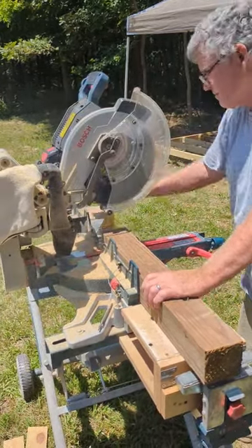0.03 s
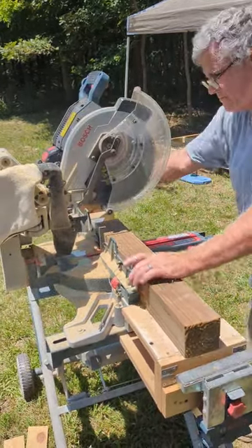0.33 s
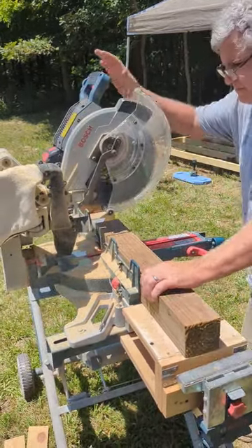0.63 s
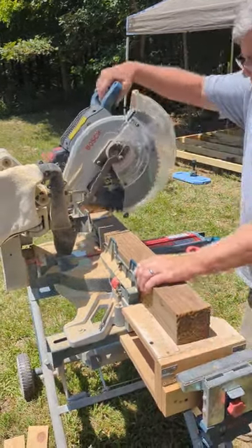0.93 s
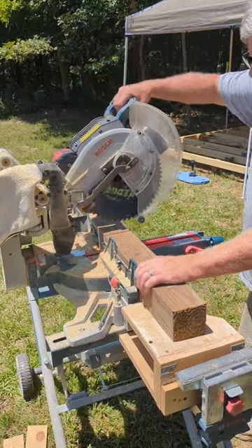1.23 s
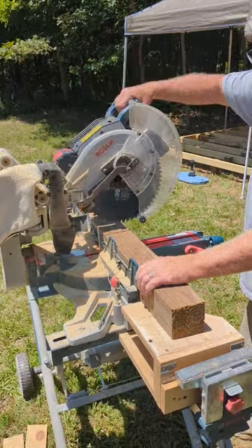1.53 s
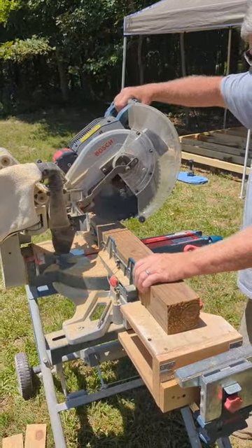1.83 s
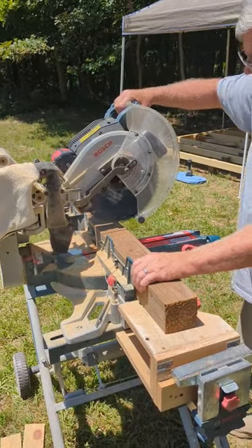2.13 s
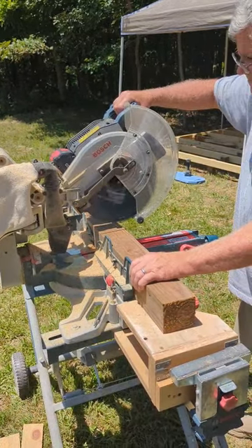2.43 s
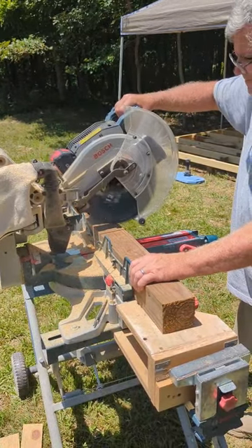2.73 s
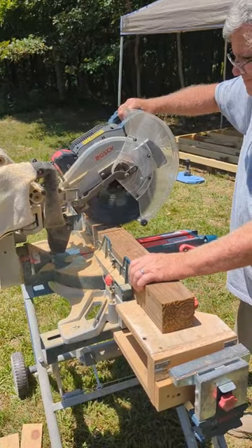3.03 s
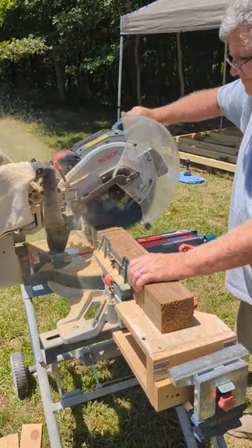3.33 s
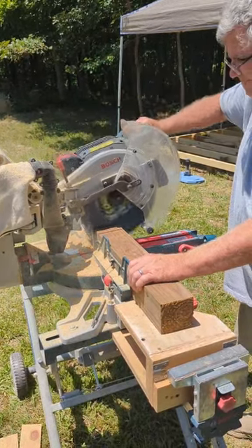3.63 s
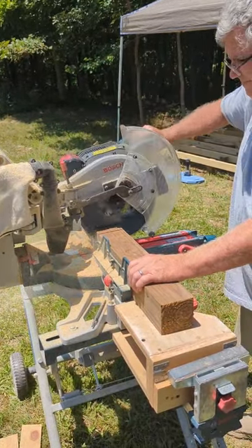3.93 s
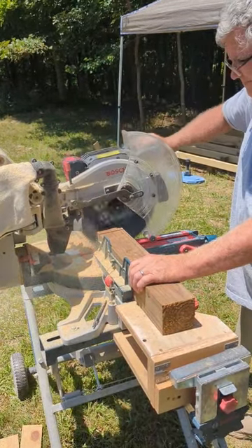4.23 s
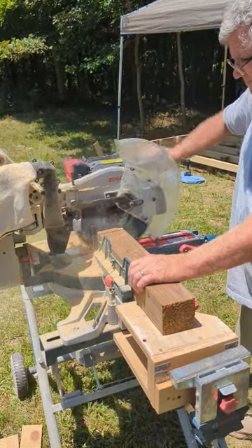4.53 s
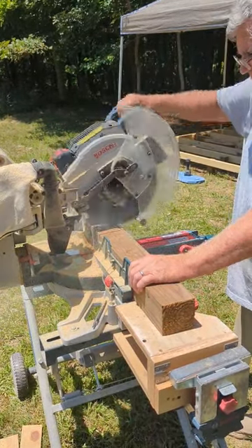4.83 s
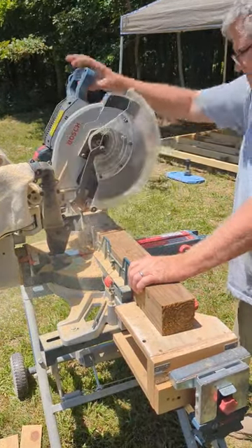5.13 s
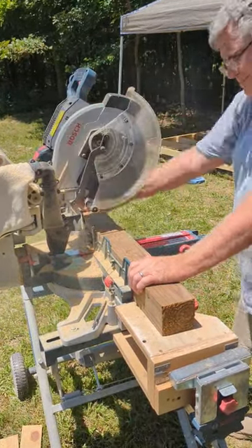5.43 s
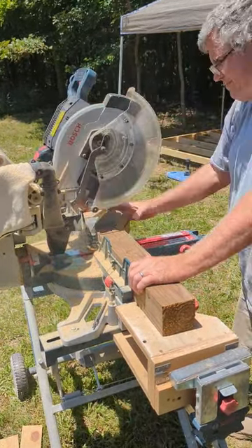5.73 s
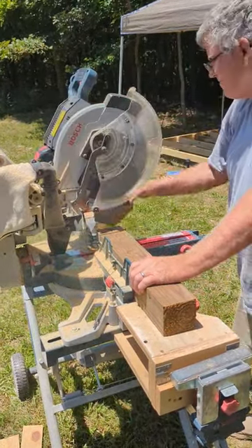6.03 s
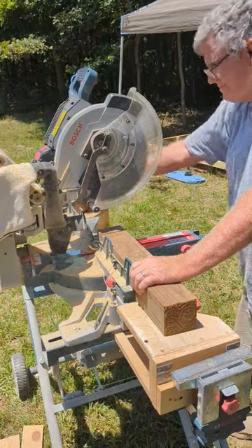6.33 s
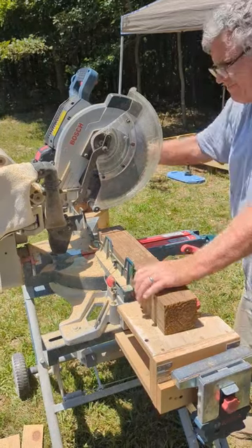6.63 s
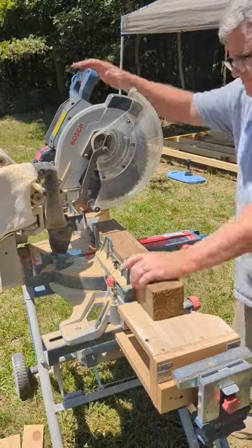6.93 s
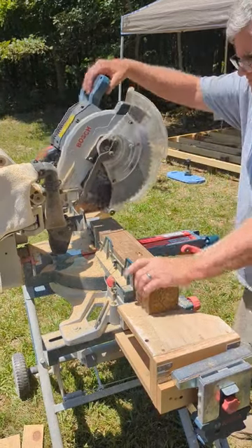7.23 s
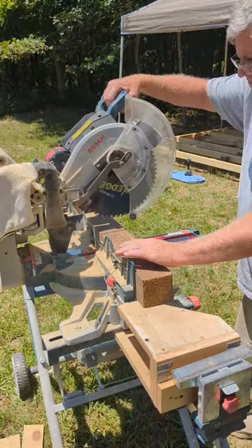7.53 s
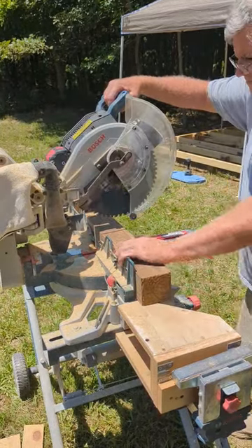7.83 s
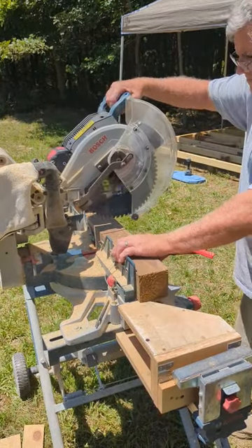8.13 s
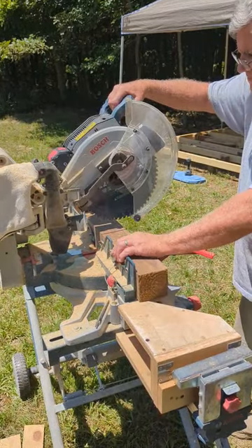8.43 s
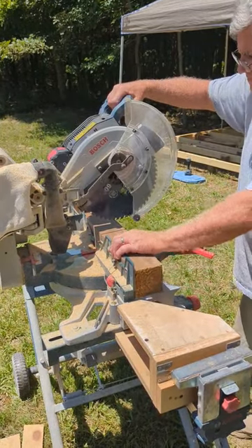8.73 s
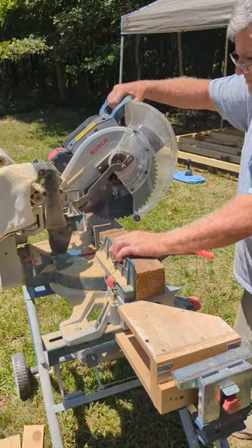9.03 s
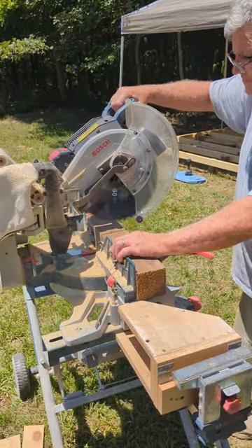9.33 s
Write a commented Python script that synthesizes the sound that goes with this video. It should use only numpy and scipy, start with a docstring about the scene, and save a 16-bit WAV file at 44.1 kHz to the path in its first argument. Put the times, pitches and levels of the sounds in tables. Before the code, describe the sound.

Close by on a quiet lawn, timber knocks on a bench while a miter saw's whine fades. With a clack the motor runs up again, whirring and rushing, and the blade roars through a wooden post. It sings briefly as it comes free, then slowly spins down. The offcut and the post knock, the blade guard rattles lightly, and the saw begins another rising whine.

```python
"""A cordless mitre saw coasts down on a breezy lawn: fan and gears whine, the teeth whip the air.
A timber post knocks on the bench. At 1.7 s the saw restarts with a clack of gears and runs up.
From 2.8 s the teeth tear through the post; the blade slows under load and squeals in the kerf.
Freed, it grazes the cut face, sings and coasts to rest. At 5.6 s the offcut knocks on the saw table,
then the post on the bench. At 8.1 s the guard rattles; at 8.7 s the motor buzzes and starts again."""
import sys
import numpy as np
from scipy import signal
from scipy.fft import rfft, irfft, next_fast_len
from scipy.io import wavfile
from scipy.ndimage import uniform_filter1d

SR = 44100
rng = np.random.default_rng(int(sys.argv[2]) if len(sys.argv) > 2 else 0)


def dump(signal):
    """Clip the signal to [-1, 1] and save it as 16-bit WAV at the path in sys.argv[1]."""
    limited = np.clip(np.atleast_2d(signal).T, -1, 1)
    pcm = np.round(limited * 32767).astype(np.int16)
    wavfile.write(sys.argv[1], SR, pcm)


N = 422478

# trigger held; the first run ends before the scene opens: (on [s], off [s])
TRIGGER_RUNS = [(-4, -1.297), (1.653, 4.95), (8.794, 12)]
# fan (orders below 40) and gear tones: (order [1/turn], driven [dB], coasting [dB], growth [dB/decade])
WHINE_ORDERS = [(11.95, -30, -28.5, 43), (23.97, -35, -34, 31), (35.97, -38, -46, 14.5),
                (41.2, -23.5, -35, 15), (45.63, -43, -34, -0.5), (47.5, -57, -46, 1.5),
                (82.8, -37, -41.5, 8.5), (86.9, -29, -30.5, 21), (93.6, -47, -47, -4), (124, -44, -38, 0.5),
                (164.6, -44.5, -51, -3)]
# housing modes that lift a passing tone: (frequency [Hz], width [Hz], driven [dB], coasting [dB])
HOUSING_MODES = [(445, 70, 8, 4), (590, 60, 4, 0), (750, 110, 5, 4), (890, 120, -4, 5), (1060, 110, 9, 12),
                 (1210, 130, 15, 5), (1610, 80, 12, 1), (1840, 120, 6, 11), (2040, 130, 9, 12),
                 (2410, 120, 7, 4), (3380, 250, 8, 5)]
# housing radiation: (frequency [Hz], gain [dB])
HOUSING_RADIATION = [(200, -22), (560, -13.5), (750, -10), (950, -13), (1400, -10), (2000, -7.5),
                     (2650, -13), (3000, -10.5), (3500, -7), (4400, -7), (5600, -14), (12000, -22)]
# air whipped by the blade: (frequency [Hz], relative density [dB])
AIR_SPECTRUM = [(60, -20), (170, -13), (350, -8.5), (560, -7.5), (900, -3), (1500, -2), (2500, -0.5),
                (2900, -2), (4900, 0.5), (5500, -10), (6400, -9), (8000, -6), (13500, -8.5), (15700, -21)]
# its growth with speed: (frequency [Hz], growth [dB/decade])
AIR_GROWTH = [(200, 18), (600, 10.5), (2000, 19), (4000, 28), (8000, 35), (15000, 29.5)]
# air rush as the blade sinks through the screening post: (time [s], gain [dB])
POST_SCREENING = [(3, 0), (3.5, -9), (4, -1), (4.5, 3.5), (4.75, -0.5)]
# blade guard: (frequency [Hz], width [Hz], gain [dB])
GUARD_MODES = [(418, 30, 3), (676, 100, -5.5), (1166, 96, 4), (1507, 110, -4.5), (2091, 191, 9.5),
               (2416, 97, -1.5), (3317, 86, -4.5), (3500, 78, 4), (4230, 150, -10.5), (4795, 130, -2.5),
               (6900, 200, 6), (7370, 330, 6), (8800, 740, -1.5), (13450, 250, -3.5)]
# outdoor background: (frequency [Hz], relative density [dB])
GARDEN_SPECTRUM = [(25, -28), (90, -17.5), (200, -7.5), (290, -10), (430, -1), (700, -9), (1200, -8),
                   (2200, -19), (3200, -27.5), (6000, -34.5), (15000, -55)]
# breeze rumble: (frequency [Hz], relative density [dB])
BREEZE_SPECTRUM = [(22, -30.5), (38, -6.5), (58, 4), (80, -1.5), (115, -6.5), (200, -15.5), (500, -52.5),
                   (2000, -79.5)]
# gusts: (time [s], length [s], level [dB])
BREEZE_GUSTS = [(5.57, .12, -55), (7.1, 0.14, -55), (8.62, 0.041, -61)]
# wood knocks: the post on the bench, and at 5.6 s the offcut on the saw table: (time [s], level [dB])
WOOD_KNOCKS = [(.294, -11), (.318, -28), (5.624, -18), (6.474, -15), (6.488, -17), (6.512, -32),
               (6.92, -27.5)]
# knocked timber: (frequency [Hz], gain [dB], t60 [s])
WOOD_MODES = [(129, -28.5, 0.071), (226, -13, 0.052), (315, -7, 0.043), (357, -10.5, 0.1),
              (444, -9.5, 0.048), (620, -8, 0.03), (856, -20, 0.062), (1110, -10, 0.025),
              (1390, -13.5, 0.026)]
# stand is bumped: (time [s], level [dB])
STAND_BUMPS = [(.3, -41), (6.5, -41), (7.17, -44), (7.3, -47), (8.655, -45)]
# stand: (frequency [Hz], gain [dB], t60 [s])
STAND_MODES = [(59, -4, 0.22), (84.5, -3, .12), (127, -13, 0.054)]
# gears take up their play: (time [s], level [dB])
GEAR_CLACKS = [(1.7115, -21.5), (1.715, -24), (1.7205, -21.5)]
# cast saw body: (frequency [Hz], gain [dB], t60 [s])
BODY_MODES = [(248, -18, 0.067), (433, -10.5, 0.16), (727, -12, 0.074), (1150, -4, 0.053),
              (1290, -4, 0.036), (1556, -9, 0.098), (1910, -5, .05), (2484, -13, 0.13), (3600, -36, 0.022),
              (4600, -38, 0.018)]
# hand pressure feeding the blade: (time [s], level [dB])
FEED_PRESSURE = [(2.8, -29), (3.15, 2.5), (3.4, -13.5), (3.7, -0.5), (4.25, 2), (4.48, -2), (4.66, -22)]
# grip of the kerf on the blade: (time [s], share [0-1])
KERF_GRIP = [(3.103, 0), (3.824, .87), (4.609, 1), (4.783, 0)]
# tearing wood: (frequency [Hz], relative density [dB])
TEARING_SPECTRUM = [(100, -18), (200, -12), (600, -2), (1000, -5), (1900, 0), (3000, -2.5), (4600, 6),
                    (5900, -2.5), (7300, 0), (9000, 2.5), (12000, 3.5), (14500, 1.5), (15700, -8)]
# blade plate, rung by chips: (frequency [Hz], width [Hz], gain [dB])
BLADE_MODES = [(1720, 120, -14.5), (1933, 240, 1.5), (3380, 49, -14.5), (4380, 100, -1.5), (5160, 50, -1.5),
               (5440, 34, 1.5), (6300, 22, -7), (6740, 67, -11), (7350, 86, 7), (7940, 280, 1.5),
               (11500, 90, -12.5), (11740, 90, 2.5), (13520, 60, -8)]
# blade squeals in the kerf: (time [s], length [s], level [dB])
KERF_SQUEALS = [(3.91, 0.032, -43), (4.21, 0.093, -33.5), (4.34, .06, -27.5)]
# rising blade grazes the cut face: (time [s], length [s], level [dB])
FACE_GRAZES = [(4.8, 0.021, -22.5), (4.858, 0.036, -21.5), (4.88, 0.014, -33), (4.942, 0.083, -23)]
# freed blade sings: (time [s], length [s], level [dB])
BLADE_SINGS = [(5.1, 0.35, -28.5)]
# offcut taps the saw table: (time [s], level [dB])
OFFCUT_TAPS = [(5.624, -25)]
# guard rattles: (time [s], relative level [dB])
GUARD_RATTLES = [(8.1381, -34), (8.1773, -44), (8.2008, -34.5), (8.226, -35.5), (8.245, -40),
                 (8.2716, -33.5), (8.3384, -48), (8.3626, -32), (8.377, -41), (8.397, -38), (8.4432, -38),
                 (8.463, -37), (8.5011, -35), (8.53, -40), (8.5455, -35.5), (8.646, -44.5), (8.745, -42)]
# rattle noise: (frequency [Hz], relative density [dB])
RATTLE_SPECTRUM = [(150, -9), (400, 2.5), (1100, 5.5), (1600, -4), (2400, 2), (3000, -9), (4800, -11.5),
                   (6000, -27), (8000, -31), (13000, -22.5), (15700, -26)]
# motor starts from rest: (time [s], length [s], level [dB])
MOTOR_BUZZES = [(8.72, 0.3, -42.5)]

FREE_RPS, REFERENCE_RPS = 66.3, 65  # blade turns per second
CUT_FROM_S, CUT_TO_S = 2.84, 4.62
BURIED_FROM_S, BURIED_TO_S = 3.15, 4.88
TIME_S = np.arange(N) / SR


def from_db(db):
    """Decibels to gain."""
    return 10 ** (np.asarray(db) / 20)


def rms_one(x):
    """Scale to rms 1."""
    return x / np.sqrt(np.mean(x ** 2) + 1e-20)


def in_time(points, outside=None):
    """A time curve at every sample."""
    times_s, values = np.transpose(points)
    return np.interp(TIME_S, times_s, values, outside, outside)


def at_hz(points, hz):
    """Read a spectrum on a log-frequency axis."""
    known_hz, values = np.transpose(points)
    return np.interp(np.log(np.maximum(hz, 1)), np.log(known_hz), values)


def drift(rate_hz):
    """Smooth random motion, rms 1."""
    r = np.exp(-40 * np.pi * rate_hz / SR)
    slow = signal.lfilter([1], [1, -2 * r, r * r], rng.standard_normal(N // 20 + 2002))[2000:]
    return np.interp(np.arange(N) / 20, np.arange(len(slow)), rms_one(slow))


def colour(x, spectrum):
    """Shape by a spectrum; rms 1."""
    size = next_fast_len(N)
    hz = np.arange(size // 2 + 1) * SR / size
    return rms_one(irfft(rfft(x, size) * from_db(at_hz(spectrum, hz)), size)[:N])


def tone(cycles, rough, width_hz):
    """Sine of rms 1, the share `rough` smeared into a narrow band."""
    smear = (drift(width_hz) + 1j * drift(width_hz)) * np.sqrt(rough / 2)
    return np.sqrt(2) * np.real((np.sqrt(1 - rough) + smear) * np.exp(2j * np.pi * cycles))


def gate(events, attack_s, release_s):
    """Envelope: rise, hold, fall after each event's length."""
    out = 0
    for start_s, length_s, db in events:
        rise = (TIME_S - start_s) / attack_s
        fall = 1 - (TIME_S - start_s - length_s) / release_s
        out = out + from_db(db) * np.clip(np.minimum(rise, fall), 0, 1)
    return out


def bursts(events, t60_s):
    """Envelope: jump at each event, then decay."""
    hits = np.zeros(N)
    for start_s, db in events:
        hits[int(start_s * SR)] += from_db(db)
    return signal.lfilter([1], [1, -from_db(-60 / (t60_s * SR))], hits + 1e-18)


def resonate(x, modes):
    """Add band-pass resonances to a signal."""
    out = x.copy()
    for hz, width_hz, db in modes:
        r = np.exp(-np.pi * width_hz / SR)
        poles = [1, -2 * r * np.cos(2 * np.pi * hz / SR), r * r]
        out += from_db(db) * (1 - r * r) / 2 * signal.lfilter([1, 0, -1], poles, x)
    return out


def struck(events, modes, crunch, contact_s):
    """Each blow, an impulse plus contact noise, rings a body's modes."""
    force = rms_one(rng.standard_normal(N)) * crunch * bursts(events, contact_s)
    for start_s, db in events:
        force[int(start_s * SR)] += from_db(db)
    out = np.zeros(N)
    for k, (hz, db, t60_s) in enumerate(modes):
        r, w = from_db(-60 / (t60_s * SR)), 2 * np.pi * hz / SR
        ring = signal.lfilter([0, np.sin(w)], [1, -2 * r * np.cos(w), r * r], force)
        out += (-1) ** k * from_db(db) * ring
    return out


def blade_speed(biting, kerf, ramp_rps_per_s=56.5, let_go_s=.07, coast_s=3.193):
    """Speed and motor power share: even run-up, sag under load, braked run-down."""
    loaded_rps = FREE_RPS - .9 * biting - 7.6 * kerf
    rps, power = 1e-3, 0
    for on_s, off_s in TRIGGER_RUNS:
        ramp_rps = ramp_rps_per_s * np.maximum(TIME_S - on_s, 0)
        driven_rps = ramp_rps / (1 + (ramp_rps / loaded_rps) ** 40) ** (1 / 40)  # soft minimum
        left_s = np.clip(off_s + coast_s - TIME_S, 0, coast_s)
        braked_rps = 24.51 * left_s - 1.452 * left_s ** 2  # brake grips less at high speed
        held = np.exp(-np.maximum(TIME_S - off_s, 0) / let_go_s)
        started = TIME_S > on_s
        rps = np.maximum(rps, started * (held * driven_rps + (1 - held) * braked_rps))
        power = np.maximum(power, started * held)
    return rps, uniform_filter1d(power, size=2000)


def drive_whine(rps, turns, power, kerf, kerf_damping_db=-12.5):
    """Fan and gear tones; gears bear on other flanks when coasting, and the kerf damps them."""
    decades = np.log10(rps / REFERENCE_RPS)
    axis_hz = np.arange(0, 12000, 5)
    driven_flare_db, coasting_flare_db = sum(
        np.outer(db, 1 / (1 + (2 * (axis_hz - mode_hz) / width_hz) ** 2))
        for mode_hz, width_hz, *db in HOUSING_MODES)
    fan, gears = 0, 0
    for order, driven_db, coasting_db, growth_db in WHINE_ORDERS:
        hz = order * rps
        level_db = power * (driven_db + np.interp(hz, axis_hz, driven_flare_db))
        level_db += (1 - power) * (coasting_db + np.interp(hz, axis_hz, coasting_flare_db))
        gain = from_db(level_db + growth_db * decades + at_hz(HOUSING_RADIATION, hz))
        if order < 40:
            fan = fan + gain * tone(order * turns, rough=.22, width_hz=18)
        else:
            gears = gears + gain * tone(order * turns, rough=.22, width_hz=30)
    # off-centre gears mesh harder once a turn, and chatter in their play when coasting slowly
    chatter = .21 * (1 - power) * np.exp(-rps / 20)
    throb = 1 + (.19 + chatter) * np.cos(2 * np.pi * turns + drift(5.7))
    turning = np.clip(rps / 9, 0, 1) ** 2
    return turning * (fan + gears * from_db(kerf_damping_db * kerf) * throb)


def air_rush(rps, turns, power, flutter_db=1.5):
    """The blade whips air through the guard: louder and brighter with speed, throbbing each turn."""
    decades = np.log10(rps / REFERENCE_RPS)
    size = next_fast_len(N)
    spectrum = rfft(colour(rng.standard_normal(N), AIR_SPECTRUM), size)
    hz = np.arange(size // 2 + 1) * SR / size
    edges_hz = 50 * 2 ** (np.arange(18) / 2)
    rush = 0
    for low_hz, high_hz in zip(edges_hz, edges_hz[1:]):
        band = irfft(spectrum * ((hz >= low_hz) & (hz < high_hz)), size)[:N]
        growth_db = at_hz(AIR_GROWTH, np.sqrt(low_hz * high_hz))
        rush = rush + band * from_db(growth_db * decades + flutter_db * drift(30))
    throb = 1 + .087 * np.sin(2 * np.pi * turns)
    level_db = -28 - 1.12 * power + in_time(POST_SCREENING) + .37 * drift(46)
    return resonate(rush * throb * from_db(level_db), GUARD_MODES)


def eddy_whistle(rps, turns, order=67.5, growth_db_per_decade=62, buried_db=-10.5):
    """Eddies behind the teeth whistle just above the tooth rate; the post smothers them."""
    buried = gate([(BURIED_FROM_S, BURIED_TO_S - BURIED_FROM_S, 0)], attack_s=.27, release_s=.13)
    level_db = -27 + growth_db_per_decade * np.log10(rps / REFERENCE_RPS) + buried_db * buried
    eddies = from_db(level_db) * tone(order * turns, rough=.97, width_hz=390)
    return resonate(eddies, GUARD_MODES)


def metal_echoes(x, ring_db=-8.5, t60_s=.06):
    """Treble bounces between blade, guard and table: a dense metallic grain."""
    delay_s = np.arange(int(.08 * SR)) / SR
    echoes = rng.standard_normal(len(delay_s)) * from_db(-60 * delay_s / t60_s) * (delay_s > .001)
    highpass = signal.butter(2, 2800, "high", fs=SR, output="sos")
    echoes = signal.sosfilt(highpass, echoes / np.linalg.norm(echoes))
    return x + from_db(ring_db) * signal.fftconvolve(x, echoes)[:N]


def outdoors(garden_db=-56.5, breeze_db=-63):
    """Quiet garden and the rumble of a light, gusting breeze."""
    garden = from_db(garden_db + .8 * drift(5.5)) * colour(rng.standard_normal(N), GARDEN_SPECTRUM)
    wind = from_db(breeze_db + 3 * drift(3.5)) + gate(BREEZE_GUSTS, attack_s=.08, release_s=.11)
    return garden + wind * colour(rng.standard_normal(N), BREEZE_SPECTRUM)


def wood_knocks():
    """Timber rings briefly: the post on the bench, the offcut on the saw table."""
    return struck(WOOD_KNOCKS, WOOD_MODES, crunch=.038, contact_s=.12)


def stand_bumps():
    """Bumps ring the stand's low modes."""
    return struck(STAND_BUMPS, STAND_MODES, crunch=.019, contact_s=.092)


def body_clacks():
    """Gears taking up play, later the offcut, ring the cast body."""
    return struck(GEAR_CLACKS + OFFCUT_TAPS, BODY_MODES, crunch=.075, contact_s=.028)


def guard_rattle():
    """Noise bursts ring the guard, at the gear clacks and in a later run of rattles."""
    shake = from_db(-10.5) * bursts(GEAR_CLACKS, t60_s=.021)
    shake += from_db(-13) * bursts(GUARD_RATTLES, t60_s=.08)
    shake += from_db(-28) * bursts(GUARD_RATTLES, t60_s=.14)
    return resonate(shake * colour(rng.standard_normal(N), RATTLE_SPECTRUM), GUARD_MODES)


def wood_cut(turns, biting, kerf, teeth=60):
    """Teeth tear out uneven chips that ring the blade; feed pressure brings out tooth and frame tones."""
    tooth_cycles = teeth * turns
    bite = biting * from_db(-26 + .8 * drift(9.1))
    for start_s, length_s, db in FACE_GRAZES:
        corners_s = start_s + np.array([0, .002, length_s / 2, length_s * 1.3])
        bite = bite + from_db(db) * np.interp(TIME_S, corners_s, [0, 1, .52, .00024])
    tooth_pulse = 1 + .5 * np.sin(2 * np.pi * tooth_cycles)
    chips = rng.standard_normal(N) * from_db(.5 * drift(900)) * tooth_pulse
    runout = 1 + .082 * np.sin(2 * np.pi * turns)  # blade out of true bites harder once a turn
    tearing = resonate(bite * colour(chips, TEARING_SPECTRUM) * runout, BLADE_MODES)
    feed = from_db(in_time(FEED_PRESSURE, outside=-120))
    squeal_gain = from_db(-34) * feed * kerf + gate(KERF_SQUEALS, attack_s=.025, release_s=.02)
    squeal = squeal_gain * tone(tooth_cycles, rough=.52, width_hz=27)
    octave = from_db(-36.5) * feed * tone(2 * tooth_cycles, rough=1, width_hz=71)
    frame_thrum = from_db(-49) * feed * tone(3 * turns, rough=.2, width_hz=8)
    return tearing + squeal + octave + frame_thrum


def blade_sing(mode_hz=3630):
    """One mode of the freed blade sings after the cut."""
    return gate(BLADE_SINGS, attack_s=.11, release_s=.14) * tone(mode_hz * TIME_S, rough=1, width_hz=73)


def motor_buzz(buzz_hz=1870):
    """The windings buzz as they first pull the rotor round."""
    return gate(MOTOR_BUZZES, attack_s=.2, release_s=.04) * tone(buzz_hz * TIME_S, rough=1, width_hz=90)


def scene():
    """Saw close by, garden behind; both channels alike."""
    biting = gate([(CUT_FROM_S, CUT_TO_S - CUT_FROM_S, 0)], attack_s=.018, release_s=.0618)
    kerf = uniform_filter1d(in_time(KERF_GRIP), size=4400)
    rps, power = blade_speed(biting, kerf)
    turns = np.cumsum(rps * (1 + .000974 * drift(6.67))) / SR
    saw = drive_whine(rps, turns, power, kerf) + air_rush(rps, turns, power)
    saw += eddy_whistle(rps, turns) + blade_sing() + wood_cut(turns, biting, kerf)
    saw = metal_echoes(saw) + motor_buzz()
    handling = wood_knocks() + body_clacks() + stand_bumps() + guard_rattle()
    mono = saw + handling + outdoors()
    return np.stack([mono, mono])


def record(dry, cutoff_hz=15750):
    """Steep low-pass."""
    return signal.sosfilt(signal.ellip(12, .1, 90, cutoff_hz, fs=SR, output="sos"), dry)


dry = scene()
out = record(dry)
dump(out)
```